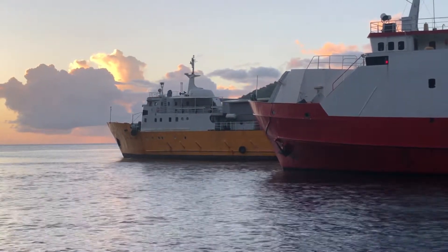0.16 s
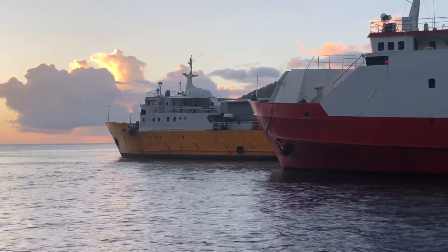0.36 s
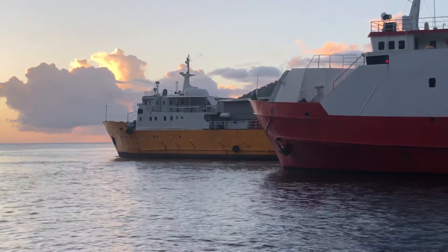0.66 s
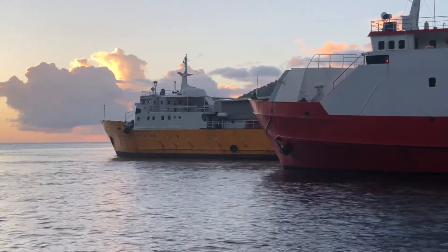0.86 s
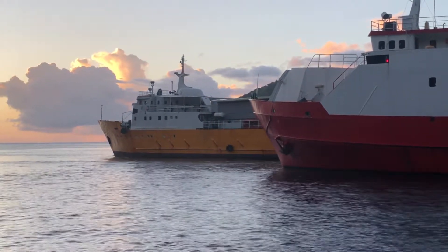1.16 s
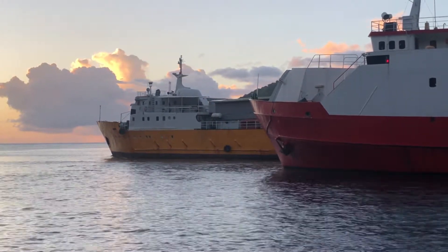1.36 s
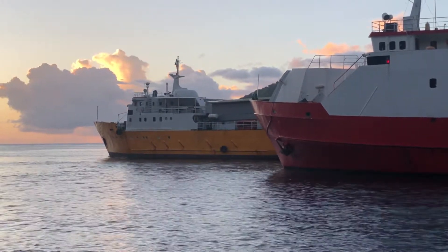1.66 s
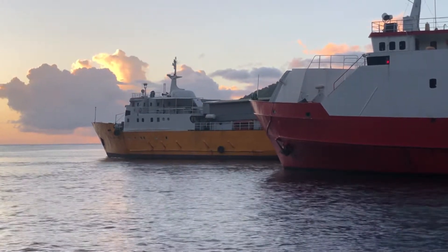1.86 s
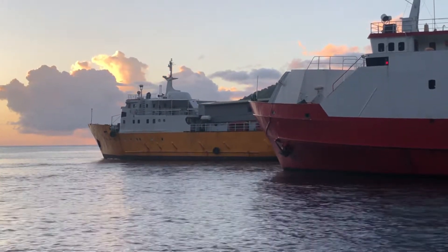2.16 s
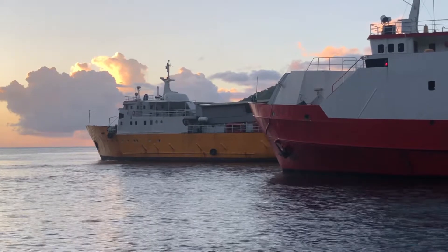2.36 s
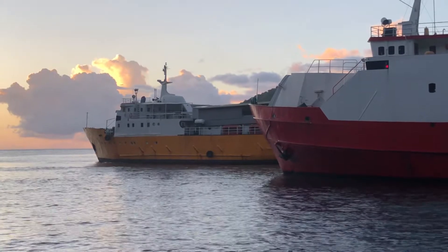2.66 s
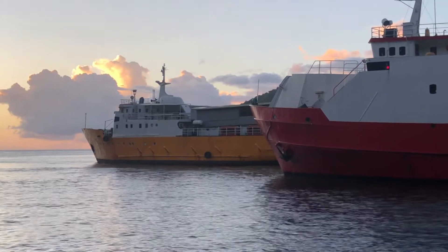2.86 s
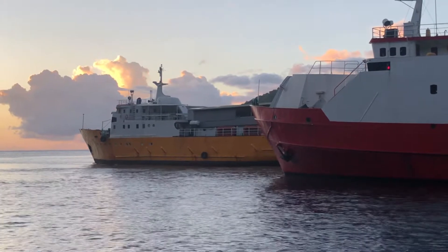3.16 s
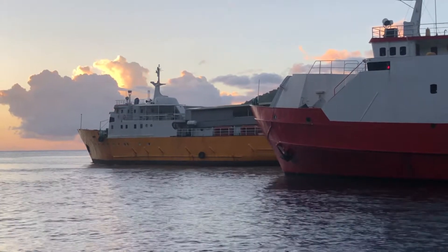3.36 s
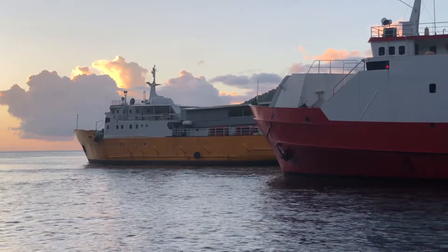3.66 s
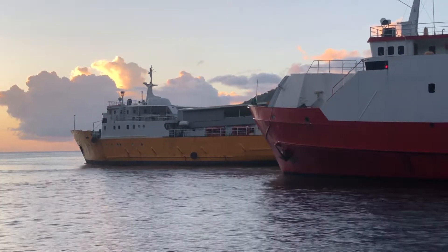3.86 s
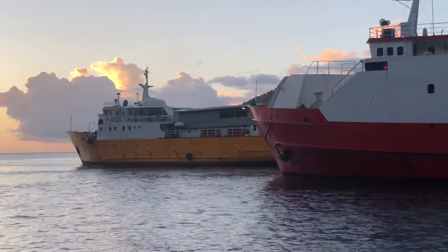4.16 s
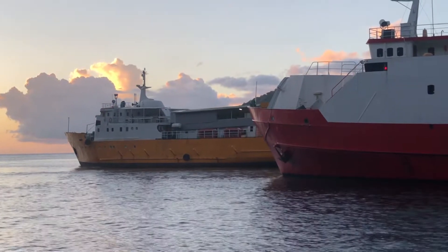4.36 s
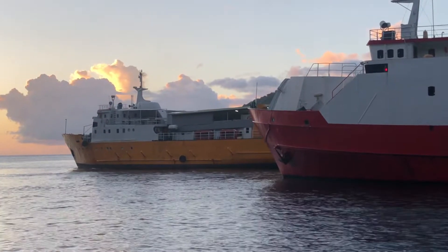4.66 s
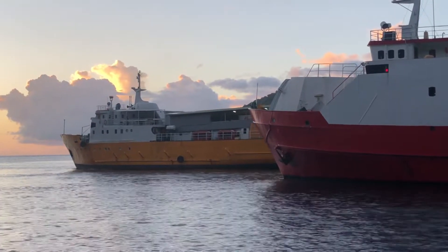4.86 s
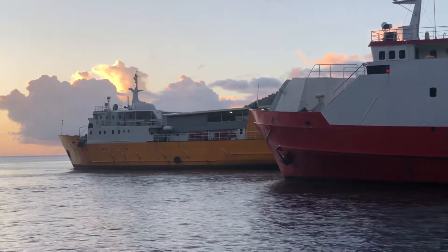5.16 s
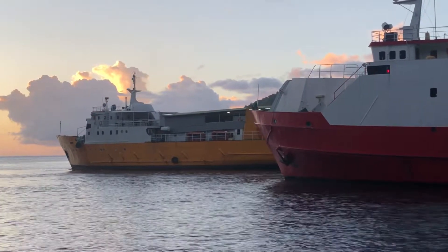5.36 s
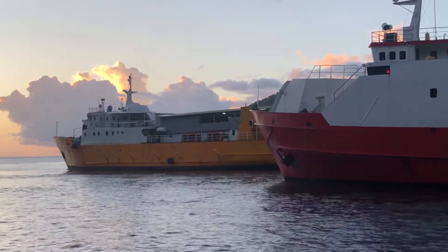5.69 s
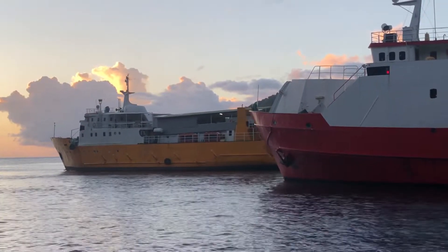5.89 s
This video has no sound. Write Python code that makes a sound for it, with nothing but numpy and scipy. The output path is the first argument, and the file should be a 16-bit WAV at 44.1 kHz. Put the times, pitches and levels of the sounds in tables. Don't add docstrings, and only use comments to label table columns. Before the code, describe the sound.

A deep ship's horn blasts steadily in a harbour, then cuts abruptly to a quiet quay with low machinery hum and lapping water.

```python
import sys
import numpy as np
from scipy import signal
from scipy.io import wavfile

SR = 44100
rng = np.random.default_rng(int(sys.argv[2]) if len(sys.argv) > 2 else 0)


def generate_wav(signal):
    frames = np.transpose(np.atleast_2d(signal))
    scaled = np.clip(frames, -1, 1) * 32767
    pcm = np.round(scaled).astype(np.int16)
    wavfile.write(sys.argv[1], SR, pcm)


def nominal_scale(level):
    x = np.asarray(level, float) / 20
    return 10 ** x


N = 265923
FADE_START_S, FADE_END_S = 2.413, 2.476


def rms_one(x):
    return x / np.sqrt(np.mean(x ** 2) + 1e-20)


def in_time(rows, count=N):
    s, *columns = np.transpose(rows)
    return [np.interp(np.arange(count) / SR, s, column) for column in columns]


def at_hz(points, hz):
    points_hz, values = np.array(points).T
    return np.interp(np.log(hz), np.log(points_hz), values)


def drift(rate_hz, count=N):
    r = np.exp(-128 * np.pi * rate_hz / SR)
    noise = rng.standard_normal(count // 64 + 2002)
    slow = signal.lfilter([1], [1, -2 * r, r * r], noise)[2000:]
    return slow * ((1 - r * r) ** 3 / (1 + r * r)) ** .5


def fill(sparse, count=N):
    return np.interp(np.arange(count) / 64, np.arange(len(sparse)), sparse)


def swells(rows, count=N):
    time = np.arange(count) / SR
    return sum(size * np.exp(-((time - s) / width) ** 2) for s, width, size in rows)


def resonance(x, hz, width_hz):
    r = np.exp(-np.pi * width_hz / SR)
    poles = [1, -2 * r * np.cos(2 * np.pi * hz / SR), r * r]
    return signal.lfilter([(1 - r * r) / 2, 0, (r * r - 1) / 2], poles, x)


def noise_bands(spectrum, count, channels, shared_db, own_db):
    edges = 18 * 2 ** np.arange(0, 10, 1 / 3)
    run_in = SR // 4
    together = drift(33.0, count)
    white = rng.standard_normal((2, channels, count + run_in))
    for k, (low, high) in enumerate(zip(edges, edges[1:])):
        band_pass = signal.butter(2, [low, high], "band", fs=SR, output="sos")
        band = signal.sosfilt(band_pass, white[k % 2])[:, run_in:]
        hz = np.sqrt(low * high)
        level_db = at_hz(spectrum, hz) + shared_db * together + own_db * drift(8.1, count)
        yield hz, band * fill(nominal_scale(level_db), count)


def horn(count):
    # time in seconds, rate in Hz.
    horn_hz = [(0, 102.62), (.6, 102.66), (2.5, 102.69)]
    # left in dB, right in dB, swell over the blast in dB, left lead in rad, its turn over the blast in rad.
    partials = [(-14, -21.3, -2.5, 1.4, .6), (-16.6, -14, 2, -.5, .8), (-19.3, -21, -2, -.35, -1.1),
                (-25.5, -22.2, 5.5, -.35, -1.1), (-23.5, -23.6, 1, 0, -.4), (-20.5, -21.7, .5, 1, 0),
                (-28.2, -30.6, -3, .2, 0), (-35.5, -50, 6, 2.2, 0), (-37, -34.2, .5, .4, -.3),
                (-41, -48, -3, .4, -1), (-42.6, -48, 1, -1.3, .5), (-45, -49, 2, -2, 0),
                (-45.5, -52, -2, -1.5, 2), (-41.8, -42.4, 1, 1.6, 2.9)]
    cancels = {3: (3.1, -.55), 4: (.68, 1.35)}
    # frequency in Hz, level in dB.
    buzz = [(1500, 4), (2100, -1), (2400, -5), (3000, -4), (3300, -6), (3800, -12), (4800, -13),
            (5500, -11), (6700, -12), (7300, -9), (8000, -14), (9300, -13), (10200, -18), (11000, -18),
            (12200, -23)]
    bright = {16: 3.0, 20: 1.5, 28: 4.0, 32: 5.5, 35: 4.0, 53: 4.0, 71: 5.5, 88: 9.0, 92: 10.0, 103: 4.0,
              109: 6.0}
    blast_s, bell_multiple, buzz_db = 2.4, 4, -53.5

    rate_hz = in_time(horn_hz, count)[0] + .05 * fill(drift(6.0, count), count)
    cycle = np.exp(2j * np.pi * np.cumsum(rate_hz) / SR)
    moved = np.arange(count) / SR / blast_s
    out, partial = np.zeros((2, count)), 1
    for k, (left_db, right_db, swell_db, lead, turn) in enumerate(partials, 1):
        partial = partial * cycle
        lag = .059 * k * k - 1.26 - 1.67 * np.arctan(6 * (k - bell_multiple))
        wave = partial * np.exp(-1j * lag) * nominal_scale(swell_db * (moved - .5))
        left_turn = turn * (moved - 1) * (left_db < right_db)
        right_turn = left_turn - lead - turn * (moved - .5)
        left = nominal_scale(left_db) * np.exp(1j * left_turn)
        right = nominal_scale(right_db) * np.exp(1j * right_turn)
        if k in cancels:
            silent_s, slide = cancels[k]
            left = left * np.sin(slide * (moved * blast_s - silent_s))
        for side, path in enumerate((left, right)):
            fading_db = (.2 + .07 * k) * drift(3.0, count)
            out[side] += fill(nominal_scale(fading_db), count) * (path * wave).real
    for k in range(len(partials) + 1, 119):
        partial = partial * cycle
        level_db = buzz_db + at_hz(buzz, k * horn_hz[1][1]) + bright.get(k, -1)
        phase = 2 * np.pi * rng.random()
        for side, tilt_db in enumerate((1.5, -1.5)):
            fading_db = 1.5 * rng.normal() + 2.2 * drift(2.0, count)
            wave = (partial * np.exp(1j * (phase + side * rng.normal()))).real
            out[side] += fill(nominal_scale(level_db + tilt_db + fading_db), count) * wave
    return out


def air(count):
    # frequency in Hz, level in dB per Hz.
    air_spectrum = [(25, -88), (45, -54), (75, -45.5), (140, -55), (250, -58), (500, -71.5), (1000, -76.5),
                    (1600, -79.5), (2500, -85.5), (4500, -85), (7000, -85.5), (9500, -85), (12000, -89.5),
                    (15000, -106)]
    # frequency in Hz, likeness from 0 to 1.
    likeness = [(45, .95), (140, .95), (500, .75), (1600, .79), (4500, .5), (9500, .1), (15000, 0)]
    # time in seconds, half width in seconds, rise in dB.
    rumble_surge = [(1.22, 0.33, 4.3)]
    hiss_surge = [(1.42, 0.35, 1.7)]
    valve_db, valve_s = 8, 0.083

    s = np.arange(count) / SR
    rumble_db = -4 - 1.7 * s + swells(rumble_surge, count)
    hiss_db = 1.88 - 1.87 * s + valve_db * np.exp(-s / valve_s) + swells(hiss_surge, count)
    out = 0
    for hz, (mid, side) in noise_bands(air_spectrum, count=count, channels=2, shared_db=-0.5, own_db=2.0):
        alike = at_hz(likeness, hz)
        level = nominal_scale(46.0 + (rumble_db if hz < 400 else hiss_db))
        wide = np.sqrt((1 - alike) / 2) * side * [[1], [-1]]
        out = out + level * (np.sqrt((1 + alike) / 2) * mid + wide)
    return out * nominal_scale(np.array([[.3], [-.3]]))


def whistle_echo(count):
    # frequency in Hz, width in Hz, level at the start in dB, time to fall 60 dB in seconds.
    echo_bands = [(794, 14, -31.5, 2.0), (772, 30, -41, 1.3), (1585, 90, -40.5, 2.2), (1550, 250, -40, 2.2),
                  (945, 20, -48, 1.5), (2100, 500, -47, 1.5)]
    s, out = np.arange(count) / SR, 0
    for hz, width_hz, level_db, t60 in echo_bands:
        noise = rng.standard_normal((2, count + SR))
        noise = noise + 1.2 * noise[::-1]
        band = resonance(resonance(noise, hz, width_hz), hz, width_hz)[:, SR:]
        out = out + nominal_scale(level_db - 60 * s / t60) * rms_one(band)
    return out


def quay():
    # frequency in Hz, level in dB per Hz.
    quay_spectrum = [(22, -37), (40, -15), (70, -2), (110, -9), (200, -11), (280, -18.5), (550, -22),
                     (1300, -27.5), (2200, -32), (4200, -34.5), (6000, -34.5), (8500, -41.5), (11000, -46),
                     (16500, -53)]
    layers_db = (-37.5, -44, -52.5, -58.5)
    wash_shares = (0.86, 1.9, .6, 0.52)
    # time in seconds, half width in seconds, rise in dB.
    washes = [
        (2.8, 0.34, -0.3),
        (3.7, 0.43, 1),
        (5.86, 0.1, 3),
    ]

    layers = np.zeros((4, N))
    for hz, band in noise_bands(quay_spectrum, count=N, channels=1, shared_db=1.0, own_db=1.0):
        layers[np.searchsorted([220, 1900, 5000], hz)] += band[0]
    wash_db = swells(washes)
    out = 0
    for layer, db, share in zip(layers, layers_db, wash_shares):
        out = out + nominal_scale(db + share * wash_db) * rms_one(layer)
    return signal.sosfilt(signal.butter(4, 42, "high", fs=SR, output="sos"), out)


def hums():
    # frequency in Hz, skirt width in Hz, skirt to tone as a ratio.
    hum_tones = [(85.7, 2.5, .3), (192.3, 2.5, .2), (580, 24, 1.5)]
    # full level in dB, short
    # of it at first in dB, rise in seconds, start of sinking in seconds, sinking in dB per second (negative:
    hum_runs = [(-36.5, 17, 0.95, 5.67, 22), (-41, 6, 0.49, 4.96, 5.5), (-52, 17, 0.59, 6.0, -4)]
    out, s = 0, np.arange(N) / SR
    for (hz, width_hz, share), run, fourth_db in zip(hum_tones, hum_runs, (-60, -19, -60)):
        full_db, short_db, rise_s, sink_s, sink_db = run
        rising_db = short_db * np.exp(-np.maximum(s - FADE_END_S, 0) / rise_s)
        db = full_db - rising_db - sink_db * np.maximum(s - sink_s, 0)
        skirt = rms_one(resonance(resonance(rng.standard_normal(N), hz, width_hz), hz, width_hz))
        turn = 2 * np.pi * np.cumsum(hz + 0.363 * fill(drift(1.54))) / SR
        tone = np.sqrt(2) * (np.sin(turn) + nominal_scale(fourth_db) * np.sin(4 * turn))
        out = out + nominal_scale(db + 1.5) * rms_one(tone + share * skirt)
    return out


def gust():
    # time in seconds, level in dB.
    puffs = [
        (2.58, -40),
        (5.71, -35),
        (5.82, -36),
        (5.94, -28.5),
    ]
    half_width_s = 0.056
    low_pass_band = signal.butter(2, [28, 70], "band", fs=SR, output="sos")
    low = signal.sosfilt(low_pass_band, rng.standard_normal(N))
    return swells([(s, half_width_s, nominal_scale(db)) for s, db in puffs]) * rms_one(low)


def ticks():
    # time in seconds, peak in dB, centre in Hz.
    tick_events = [(2.897, -50, 6000), (2.93, -47, 7000), (2.947, -44, 3500), (3.047, -49, 5000),
                   (3.4675, -47, 11900), (3.4697, -37, 12000), (3.4755, -34, 15000), (3.501, -44, 7500),
                   (3.512, -39, 14500), (3.549, -40, 3500), (3.58, -37.5, 7840), (3.585, -46, 4500),
                   (3.589, -45, 4350), (3.687, -41, 4230), (3.7749, -39, 8000), (3.8667, -42, 10700),
                   (4.07, -45, 9000), (4.979, -43, 4140), (5.25, -51, 10000), (5.33, -46, 2700),
                   (5.42, -53, 9000)]
    out, size = np.zeros(N), 400
    for s, db, hz in tick_events:
        burst = rng.standard_normal(size) * np.exp(-np.arange(size) / SR / .0005)
        burst = resonance(resonance(burst, hz, .3 * hz), hz, .3 * hz)
        out[round(s * SR):][:size] += nominal_scale(db) * burst / np.abs(burst).max()
    return out


def scene():
    count = int(2.52 * SR)
    fade = np.interp(np.arange(N) / SR, (FADE_START_S, FADE_END_S), [0, 1])
    blast = horn(count) + air(count) + whistle_echo(count)
    out = np.tile((quay() + hums() + gust() + ticks()) * fade, (2, 1))
    out[:, :count] += blast * (1 - fade[:count])
    return out


def band_limit(x):
    return signal.sosfilt(signal.butter(12, 15640, fs=SR, output="sos"), x)


def record(dry):
    return band_limit(dry)


dry = scene()
out = record(dry)
generate_wav(out)
```